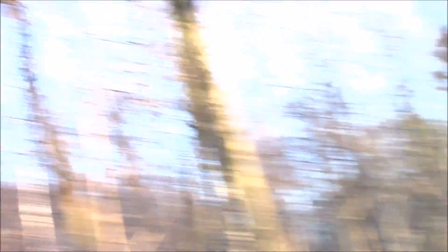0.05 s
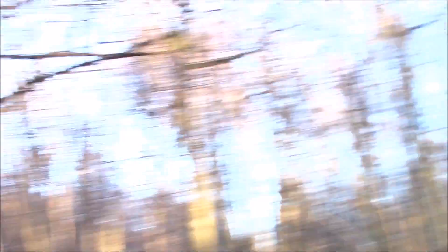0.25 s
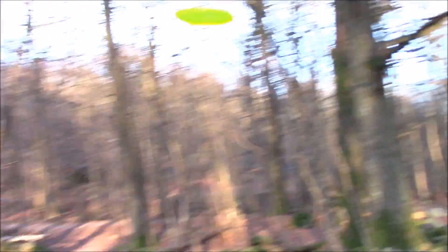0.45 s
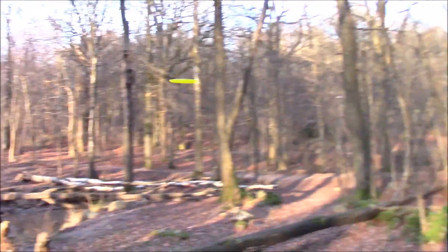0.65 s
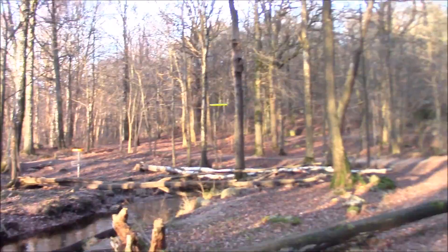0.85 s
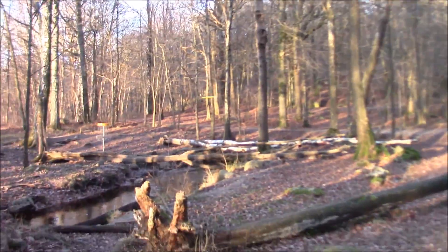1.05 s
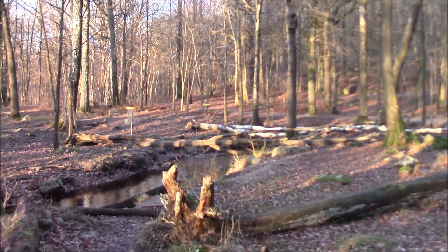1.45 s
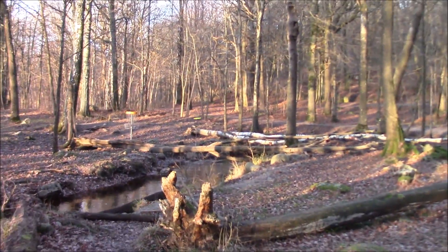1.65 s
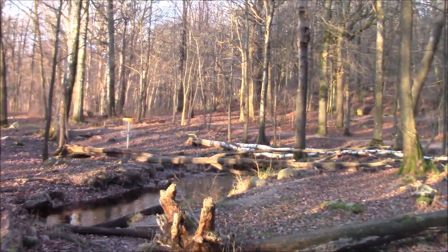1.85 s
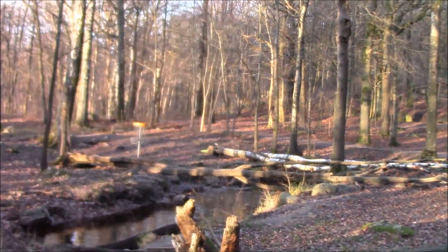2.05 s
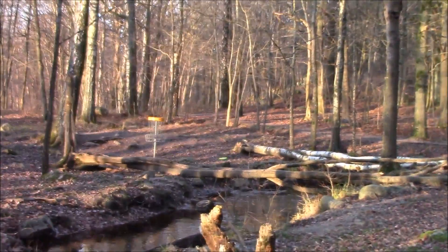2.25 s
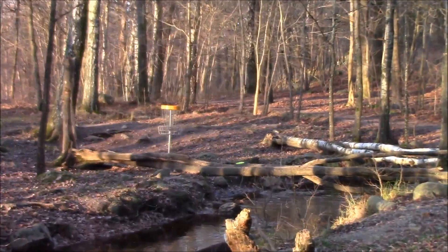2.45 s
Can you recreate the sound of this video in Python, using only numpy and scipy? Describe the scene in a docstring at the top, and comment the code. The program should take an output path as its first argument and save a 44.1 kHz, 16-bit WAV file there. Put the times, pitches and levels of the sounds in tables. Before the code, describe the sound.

Wind rushes across a swinging microphone from 0.2 to 0.6 seconds, a loud low rumble with thumps and a sharp camera case click at 0.5. Close clothing rustles and snaps around 0.7 to 0.9 seconds, then rubs faintly. Small puffs of air keep returning, with soft thumps near 1.3 and 1.8 seconds, over a faint hush of distant trees. Dry leaves or twigs tick at about 2.4 seconds.

```python
"""In a wood, a hand-held camera swings round over the hush of far-off trees and faint microphone hiss.
Air rushes across its microphone with a hard rumble and a few thumps, then returns in small puffs.
Close by, clothing rubs and its creases snap, the camera's case clicks under the hand, and near the end
a few dry leaves or twigs tick. Loud wind makes the camera turn itself down, then slowly back up."""
import sys
import numpy as np
from scipy import signal
from scipy.fft import rfft, irfft
from scipy.io import wavfile
from scipy.ndimage import uniform_filter1d

SR = 44100
rng = np.random.default_rng(int(sys.argv[2]) if len(sys.argv) > 2 else 0)


def wrap_up_sound(samples):
    """Save the sound to the file named by the first command line argument, as 16-bit audio."""
    columns = np.atleast_2d(samples).T
    # keep every value between -1 and 1, then stretch to whole-number steps
    tamed = np.clip(columns, -1, 1)
    steps = np.round(tamed * 32767).astype(np.int16)
    wavfile.write(sys.argv[1], SR, steps)


N = 110250  # 2.5 seconds
TIME = np.arange(N) / SR


def gain(db):
    """Turn decibels into a number to multiply by."""
    return 10 ** (np.asarray(db) / 20)


def normalise(x):
    """Scale a signal to an average strength (rms) of 1."""
    return x / np.sqrt(np.mean(x ** 2))


def envelope(points):
    """Join (time [s], level [dB]) points into a gain that changes over time."""
    return gain(np.interp(TIME, *np.array(points).T))


def colour(x, points):
    """Shape the tone of a sound with (frequency [Hz], level [dB]) points."""
    hz, db = np.array(points).T
    freqs = np.maximum(np.fft.rfftfreq(N, 1 / SR), 1)
    return irfft(rfft(x) * gain(np.interp(np.log(freqs), np.log(hz), db)), N)


def stereo_noise(tone, spread, width=1):
    """Noise with a part both channels share and a side part that sets left and right apart."""
    shared, side = rng.standard_normal((2, N))
    side = width * colour(side, spread)
    return normalise(colour(np.array([shared + side, shared - side]), tone))


def wander(rate_hz):
    """A smooth random drift, about 1 in size."""
    span = max(int(SR / rate_hz), 1)
    return normalise(uniform_filter1d(uniform_filter1d(rng.standard_normal(N), span), span))


# air rushing past as the camera swings (time [s], level [dB])
SWING_LEVEL = [(0.2, -51), (0.218, -20.5), (0.28, -16), (0.325, -12), (0.35, -12), (0.425, -7.5),
               (0.465, -10), (0.53, -7.5), (0.57, -14.5), (0.61, -12), (0.655, -32.5)]
# puffs of breeze (time of peak [s], half length [s], level [dB])
PUFFS = [(0.029, 0.024, -25), (0.137, 0.067, -35.5), (0.706, 0.027, -26), (0.79, 0.0062, -35),
         (0.907, 0.0061, -31), (0.979, 0.026, -28), (1.094, 0.025, -30), (1.205, 0.01, -21.5),
         (1.28, 0.035, -23.5), (1.476, 0.0083, -29), (1.553, 0.011, -27), (1.597, 0.034, -28.5),
         (1.665, .012, -30.5), (1.712, 0.017, -28), (1.776, 0.044, -26), (1.851, 0.012, -23.5),
         (1.936, 0.049, -34), (1.994, 0.016, -26), (2.04, 0.01, -30.5), (2.123, 0.05, -28.5),
         (2.285, 0.043, -27), (2.408, .01, -36.5), (2.483, 0.0037, -23.5)]
# tone of the low rumble (frequency [Hz], level [dB])
RUMBLE_TONE = [(25, -33), (50, -22), (80, -23), (125, -8.5), (200, -1.5), (300, -1.5), (420, -7.5),
               (600, -16.5), (900, -26), (1500, -41), (3000, -75)]
# brighter, churning air during the swing (time [s], level [dB])
CHURN_LEVEL = [(0.2, -63), (0.28, -40), (0.33, -25), (0.345, -10), (0.39, -17), (0.44, -13.5),
               (0.47, -26.5), (0.515, -14), (0.6, -29.5), (0.67, -71)]
# tone of that churning air (frequency [Hz], level [dB])
CHURN_TONE = [(100, -36), (300, -2), (550, 7), (800, 1.5), (1200, -7), (2000, -22), (2800, -29),
              (4000, -59), (6000, -53)]
# how wide the wind sounds (frequency [Hz], side level against shared [dB])
WIND_SPREAD = [(40, -25), (75, -18), (125, -52.5), (200, -22), (300, -15.5), (450, -1.5), (700, -2.5),
               (1500, 1.5), (4000, -9)]
BREEZE_DB, FULL_WIDTH_DB = -42.5, -20  # the steady breeze; the level where the rumble is widest
FLUTTER_DB, FLUTTER_HZ, FLICKER_DB, FLICKER_HZ = 1.5, 106, 3, 200
LEAN_LEFT_DB = np.array([[1.75], [-1.75]])  # left channel up, right channel down


def wind():
    """Air on the microphone rumbles, louder and wider as it speeds up; the swing adds a bright churn."""
    swinging = (TIME > SWING_LEVEL[0][0]) * (TIME < SWING_LEVEL[-1][0])
    swing = swinging * envelope(SWING_LEVEL)
    puffs = sum(gain(db) * np.exp(-((TIME - at) / half) ** 2) for at, half, db in PUFFS)
    air = np.sqrt(swing ** 2 + puffs ** 2 + gain(BREEZE_DB) ** 2)
    width = np.minimum(air / gain(FULL_WIDTH_DB), 1)
    rumble = air * stereo_noise(RUMBLE_TONE, WIND_SPREAD, width)
    flicker = normalise(gain(FLICKER_DB * wander(FLICKER_HZ)))
    churn_gain = swinging * envelope(CHURN_LEVEL) * flicker * gain(LEAN_LEFT_DB)
    churn = churn_gain * stereo_noise(CHURN_TONE, WIND_SPREAD)
    flutter = normalise(gain(FLUTTER_DB * wander(FLUTTER_HZ)))
    return (rumble + churn) * flutter


# how hard the clothing rubs (time [s], level [dB])
RUB_LEVEL = [(0.0, -56), (0.38, -63.5), (0.45, -47), (0.57, -40.5), (0.685, -24.5), (0.725, -35),
             (0.76, -35), (0.835, -39), (0.865, -53.5), (0.96, -43.5), (1.02, -47.5), (1.11, -43.5),
             (1.21, -49.5), (1.31, -64), (1.39, -52.5), (1.59, -47), (1.71, -59), (1.85, -47.5),
             (1.94, -56), (2.2, -60.5), (2.5, -60)]
# tone of the cloth (frequency [Hz], level [dB])
CLOTH_TONE = [(1180, -7), (2000, -6), (3140, -6), (3650, -6), (5390, 0.5), (7510, -6), (8550, -5),
              (10800, -9.5), (12900, -8), (16000, -22.5)]
# creases snapping (time [s], level [dB])
SNAPS = [(0.1364, -32), (0.4545, -28), (0.627, -23), (0.7417, -12), (0.76, -17.5), (0.781, -27),
         (0.789, -18), (0.794, -28), (0.8135, -19), (0.844, -19), (0.971, -26), (1.083, -28.5),
         (1.123, -29), (1.137, -22), (1.367, -33), (1.568, -33), (1.837, -30), (1.887, -27)]
GRAINS_PER_S, GRAIN_SPREAD_DB, SNAP_FADE_S = 1600, 3.5, 0.0009
HISS_DB, CRACKLE_DB = -3, -2.5


def clothing():
    """Rubbing cloth hisses and crackles with tiny clicks (grains); now and then a crease snaps."""
    tone = [(375, -40), (1500, -6)] + list(CLOTH_TONE)  # cloth has very little bass
    grains = (rng.random(N) < GRAINS_PER_S / SR) * rng.standard_normal(N)
    grains *= gain(GRAIN_SPREAD_DB * np.minimum(rng.exponential(size=N), 4))  # a few stand out
    crackle = normalise(colour(grains, tone))
    hiss, snap_noise = normalise(colour(rng.standard_normal((2, N)), tone))
    rubbing = envelope(RUB_LEVEL) * gain(2.2 * wander(90))
    rustle = rubbing * (gain(HISS_DB) * hiss + gain(CRACKLE_DB) * crackle)
    snaps = sum(gain(db) * (TIME >= at) * np.exp(-np.abs(TIME - at) / SNAP_FADE_S) for at, db in SNAPS)
    return rustle + snaps * snap_noise / 2


# tone of the far-off trees and microphone hiss together (frequency [Hz], level [dB])
BACKGROUND_TONE = [(30, -15), (100, 6), (250, -2.5), (600, 0), (1200, 0), (2000, -3.5), (3200, -7.5),
                   (5000, -16), (8000, -26.5), (13000, -47), (16000, -50)]
# width: narrow for the trees, wider for the hiss (frequency [Hz], side level against shared [dB])
BACKGROUND_SPREAD = [(100, -41), (300, -22), (700, -24.5), (1500, -17), (4000, -14), (12000, 4)]
BACKGROUND_DB = -42


def background():
    """The even, nearly mono hush of far-off trees, with faint, wider microphone hiss in the treble."""
    return gain(BACKGROUND_DB + 0.2 * wander(12)) * stereo_noise(BACKGROUND_TONE, BACKGROUND_SPREAD)


# swirls of air hitting the microphone (time [s], level [dB], pitch [Hz])
SWIRLS = [(0.2397, -9, 405), (0.2955, -11, 860), (0.3335, -6, 507), (0.3343, -11, 1600), (0.345, -11, 1450),
          (0.355, -18.5, 1500), (0.381, -12.5, 1400), (0.39, -17, 1300), (0.4065, 2.5, 295),
          (0.489, 0, 353), (0.512, 1, 580), (1.205, -22.5, 296), (1.216, -13.5, 292), (1.2914, -6.5, 370),
          (1.478, -24, 342), (1.7706, -10.5, 315), (1.784, -15.5, 434)]
FULL_LEAN_HZ = 1000  # swirls this high or higher lean furthest left


def air_thumps():
    """Each swirl of air is a thump about one wave long; small ones sound higher and lean to the left."""
    thumps = 0
    for at, db, hz in SWIRLS:
        cycles = (TIME - at) * hz
        lean_db = LEAN_LEFT_DB * min(hz / FULL_LEAN_HZ, 1) ** 2
        pulse = np.sin(2 * np.pi * cycles) * np.exp(-2 * cycles ** 2)
        thumps = thumps + gain(db + lean_db) * pulse
    return thumps


def taps(hits, notes, scrape_db, scrape_s):
    """Each tap comes with a brief scrape and makes a small object ring at its own notes."""
    t = np.arange(SR // 10) / SR
    track = np.zeros(N + SR)
    ring = sum(gain(db - 60 * t / fade_s) * np.sin(2 * np.pi * hz * t) for hz, db, fade_s in notes)
    for at, db in hits:
        scrape = gain(scrape_db) * rng.standard_normal(len(t)) * np.exp(-t / scrape_s)
        push = (t == 0) + scrape
        tap = signal.fftconvolve(push, ring)[:len(t)]
        start = int(at * SR)
        track[start:start + len(t)] += gain(db) * tap / np.abs(tap).max()
    return track[:N]


# clicks of the camera's case (time [s], peak level [dB])
CASE_CLICKS = [(0.494, -6.5), (0.508, -22)]
# notes the case rings at (pitch [Hz], level [dB], time to fade by 60 dB [s])
CASE_NOTES = [(2420, 4.5, 0.023), (2840, 1, 0.021), (3148, 9, 0.026), (3600, -2.5, 0.036),
              (3900, -16, .016), (6100, -9, .008), (8400, -24, .006)]


def camera_case():
    """The case clicks under the hand and rings for a moment."""
    return taps(CASE_CLICKS, CASE_NOTES, scrape_db=-23.5, scrape_s=0.0012)


# ticks of dry leaves or twigs (time [s], peak level [dB])
TWIG_TICKS = [(2.445, -18.5), (2.4572, -52), (2.462, -33), (2.4745, -32), (2.4872, -43)]
# notes they ring at (pitch [Hz], level [dB], time to fade by 60 dB [s])
TWIG_NOTES = [(4830, -8.5, 0.011), (6900, -8, .004), (9060, -2, 0.0046), (9870, -6, 0.0058),
              (12700, -12, .006)]


def twigs():
    """Small dry leaves or twigs tick with a high ring that dies almost at once."""
    return taps(TWIG_TICKS, TWIG_NOTES, scrape_db=-16, scrape_s=0.00046)


def scene():
    """Add the small clicks, the wind and the clothing to the even background."""
    clicks = camera_case() + twigs()
    return clicks + wind() + air_thumps() + clothing() + background()


LIMIT_DB, RECOVERY_DB_PER_S, CEILING = -8, 4, 0.92
LOW_CUT_HZ, HIGH_CUT_HZ = 82, 15700


def record(dry):
    """The camera turns loud wind down at once, recovers slowly, rounds peaks, trims bass and treble."""
    power = uniform_filter1d(np.mean(dry ** 2, axis=0), SR // 80)
    level_db = 10 * np.log10(np.abs(power) + 1e-12)
    excess_db = np.maximum(level_db - LIMIT_DB, 0)
    recovery_db = RECOVERY_DB_PER_S * TIME
    turn_down_db = np.maximum.accumulate(excess_db + recovery_db) - recovery_db
    low_cut = signal.butter(2, LOW_CUT_HZ, "high", fs=SR, output="sos")
    high_cut = signal.ellip(8, .2, 70, HIGH_CUT_HZ, fs=SR, output="sos")
    held = signal.sosfilt(low_cut, dry * gain(-turn_down_db))
    rounded = held / (1 + (held / CEILING) ** 8) ** (1 / 8)
    return signal.sosfilt(high_cut, rounded)


dry = scene()
out = record(dry)
wrap_up_sound(out)
```